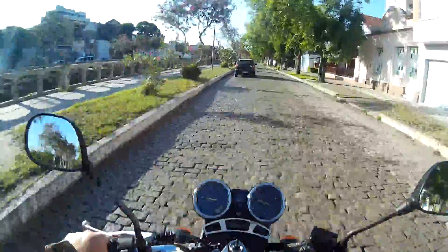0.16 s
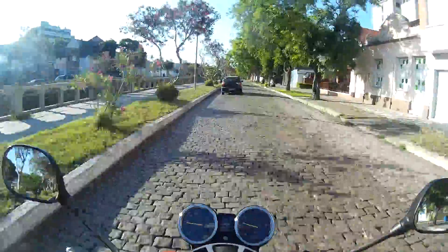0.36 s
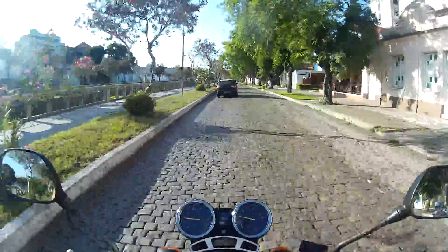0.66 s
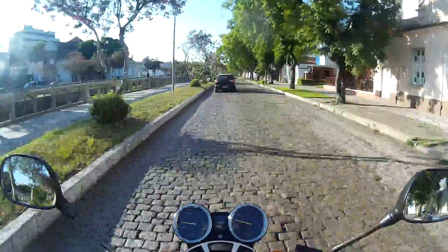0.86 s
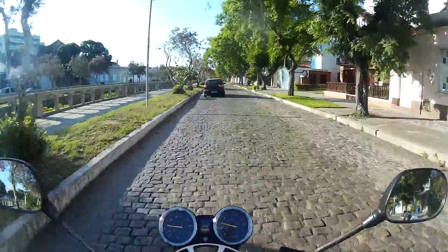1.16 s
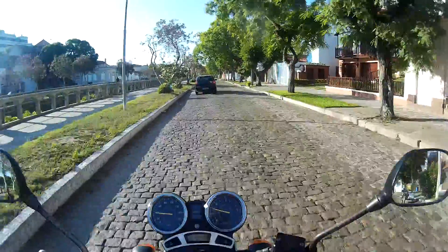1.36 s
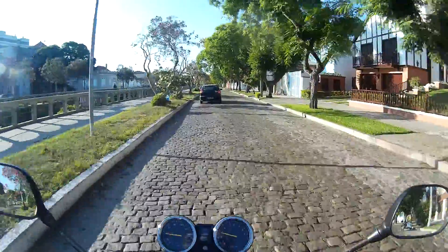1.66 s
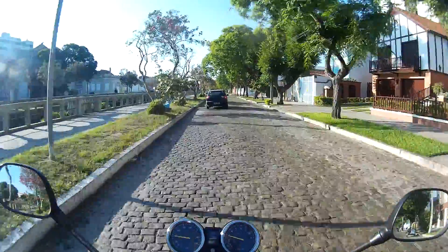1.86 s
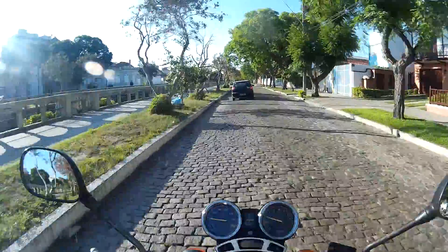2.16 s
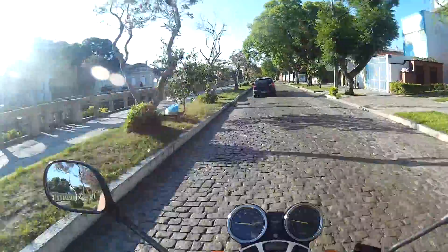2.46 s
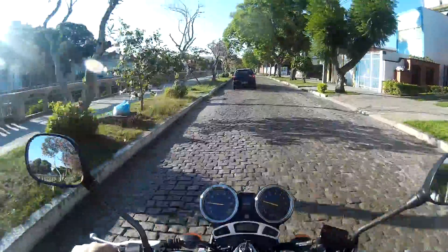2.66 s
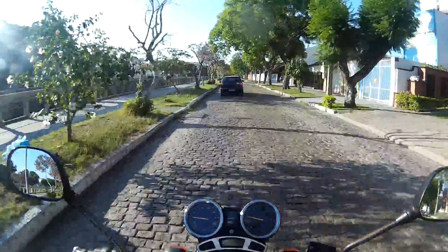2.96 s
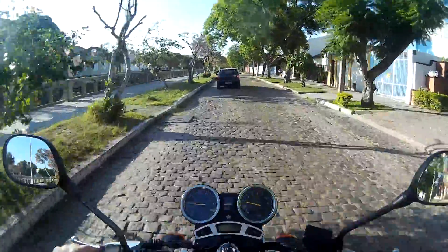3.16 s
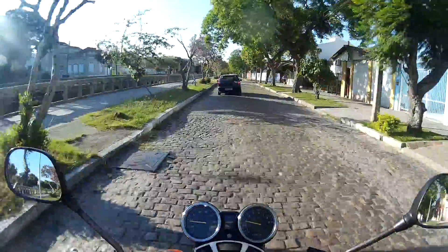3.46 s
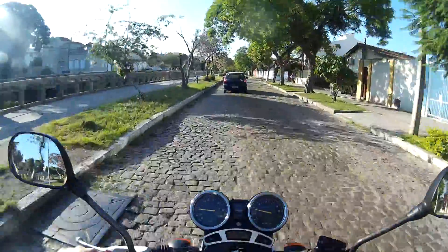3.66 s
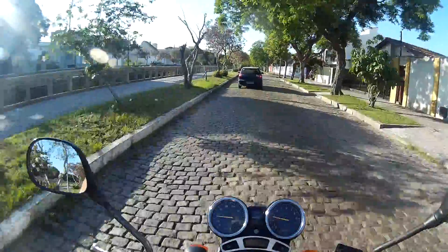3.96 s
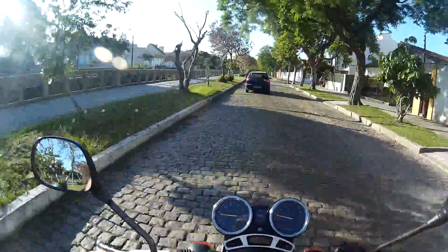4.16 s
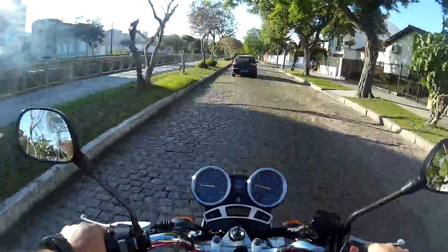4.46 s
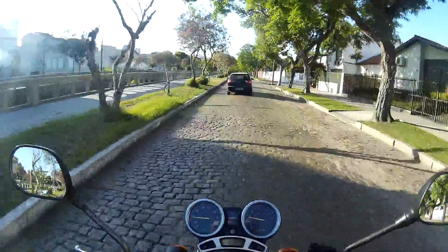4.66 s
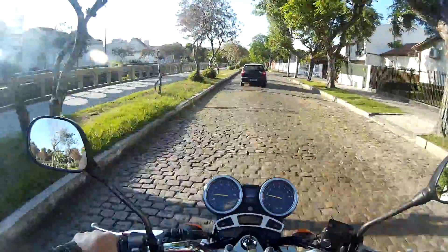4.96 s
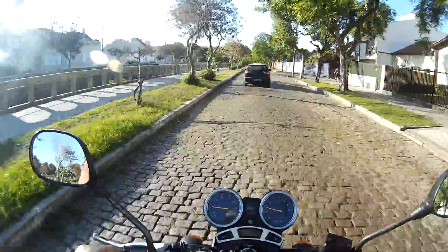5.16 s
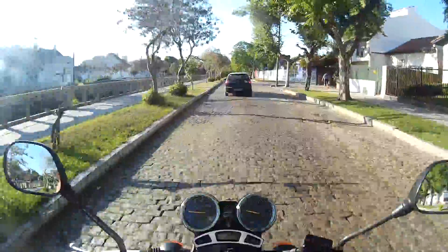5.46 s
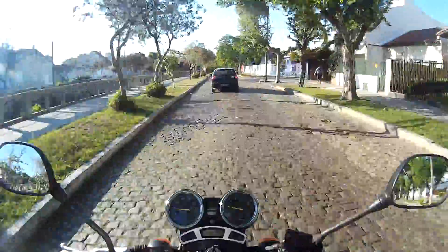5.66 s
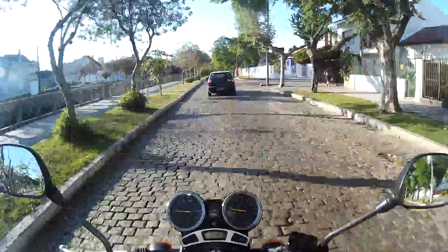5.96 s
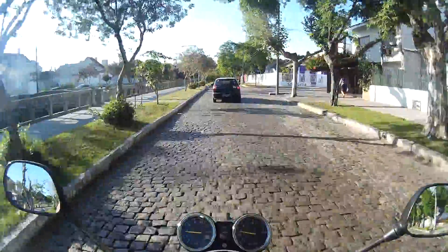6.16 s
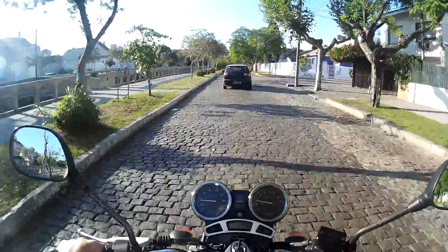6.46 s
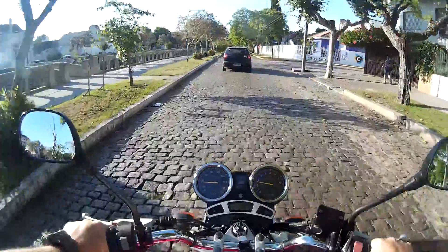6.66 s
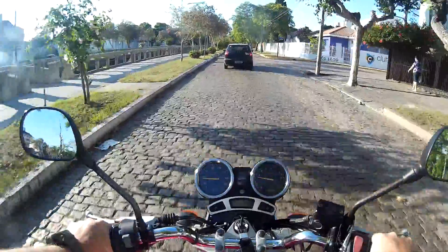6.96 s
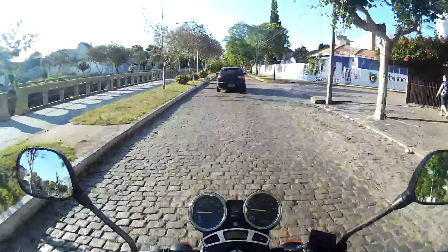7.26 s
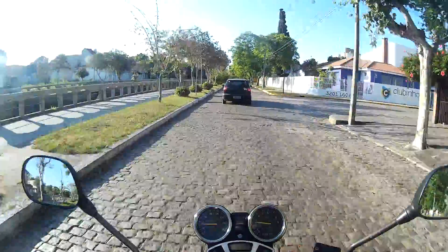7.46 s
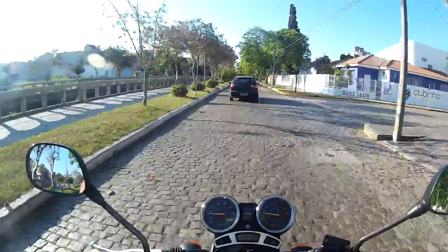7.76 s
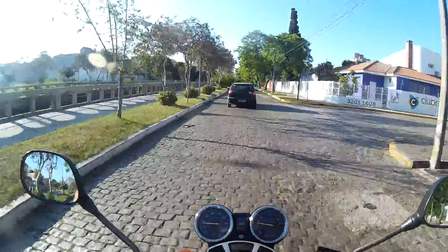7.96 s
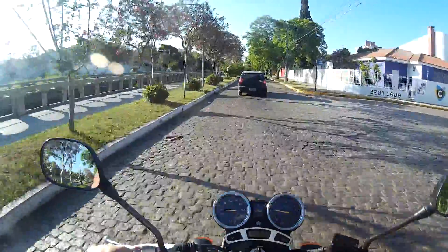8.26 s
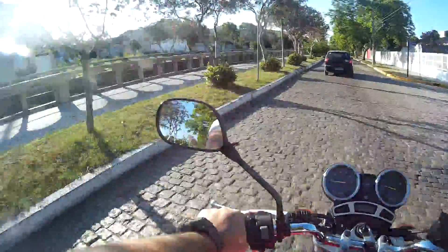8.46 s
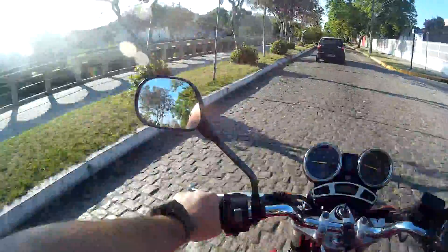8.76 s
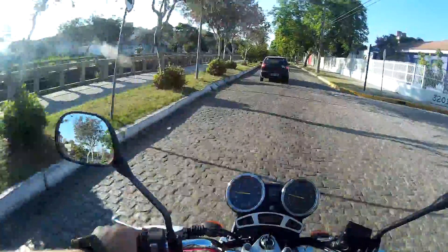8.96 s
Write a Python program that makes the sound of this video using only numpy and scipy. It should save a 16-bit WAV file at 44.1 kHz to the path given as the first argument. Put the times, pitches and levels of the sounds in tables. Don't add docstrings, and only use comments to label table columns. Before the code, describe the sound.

Heard from inside a plastic case on the rider: dull single-cylinder drone, deep jolting rumble, thin ringing whine and uneven knocks on cobbles.

```python
import sys
import numpy as np
from scipy import signal
from scipy.fft import rfft, irfft, next_fast_len
from scipy.io import wavfile
from scipy.ndimage import map_coordinates

SR = 44100
rng = np.random.default_rng(int(sys.argv[2]) if len(sys.argv) > 2 else 0)


def generate_wav(sig):
    pcm = np.round(np.clip(np.atleast_2d(sig).T, -1, 1) * 32767).astype(np.int16)
    wavfile.write(sys.argv[1], SR, pcm)


def invert_db(x):
    u = np.asarray(x, float) / 20
    return 10 ** u


N = 402176

# [t/s, roughness/dB]
ROUGHNESS = [(0, 2.5), (.3, -1.5), (.72, 1), (1.05, 0), (1.6, 2.5), (2.2, 3), (2.7, 3), (3.2, -1), (3.6, 2),
             (3.95, -2.5), (4.18, 3.5), (4.6, -1), (5.4, 1.5), (6.2, -4), (7.2, -.5), (7.7, 1), (8.0, -0.5),
             (9.12, 0.5)]
# [t/s, firing rate f/Hz, level passed into the frame/dB]
ENGINE_SPEED = [(0, 31.77, -51.5), (1, 32.19, -63), (1.8, 32.3, -61), (2.6, 31.43, -50), (4, 30.84, -52),
                (5, 30.6, -57.5), (5.7, 30.33, -59), (6.1, 29.22, -51), (6.6, 29.1, -52.5),
                (7.2, 29.25, -63), (8, 29.57, -64), (9.12, 29.86, -55)]
# [f/Hz, level per Hz/dB]
HISS_COLOUR = [(1000, 1), (6000, 1), (14500, 0), (15500, -2)]


def unit(x):
    return x / np.sqrt(np.mean(x ** 2) + 1e-20)


def curves(rows):
    s, *columns = np.transpose(rows)
    return [np.interp(np.arange(N) / SR, s, column) for column in columns]


def wobble(rate):
    knots = rng.standard_normal(int(N * rate / SR) + 4)
    return map_coordinates(knots, [np.arange(N) * rate / SR])


def filtered(x, response):
    m = next_fast_len(N + SR // 2)
    return irfft(rfft(x, m) * response(np.fft.rfftfreq(m, 1 / SR)), m)[:N]


def coloured(points):
    f, db = np.transpose(points)

    def gain(hz):
        return invert_db(np.interp(np.log(hz + 1), np.log(f + 1), db, -120, -120))

    return unit(filtered(rng.standard_normal(N), gain))


def resonant(x, modes, dull_hz):
    def response(f):
        total = 0
        for k, (centre, width, db) in enumerate(modes):
            damping = 1j * f * width
            total = total + (-1) ** k * invert_db(db) * damping / (centre ** 2 - f ** 2 + damping)
        return total / (1 + 1j * f / dull_hz) ** 2

    return filtered(x, response)


def chatter(rate, spread_db, share):
    happens = rng.random(N) < rate / SR
    size = invert_db(spread_db * np.clip(rng.standard_normal(N), -2, 2))
    taps = happens * size * rng.choice([-1, 1], N)
    return rng.standard_normal(N) + share * unit(taps)


def road():
    # [t/s, peak level/dB, width/s]
    high_stones = [(0.359, -31, 0.009), (0.49, -32, 0.0078), (0.568, -31, 0.012), (0.677, -24.5, 0.012),
                   (0.743, -32, 0.0092), (1.141, -30, 0.01), (1.722, -32, 0.0096), (1.788, -31.5, 0.013),
                   (1.982, -27.9, 0.015), (2.052, -29, 0.025), (2.124, -31.5, 0.027), (2.498, -33.5, 0.016),
                   (2.605, -33, 0.013), (2.82, -33, 0.031), (2.895, -34, 0.025), (3.069, -32.5, 0.028),
                   (3.119, -29, 0.011), (3.606, -32.5, 0.012), (3.673, -31, 0.011), (4.121, -33.5, 0.027),
                   (4.188, -25.5, 0.01), (5.468, -32.5, 0.014), (5.703, -32.5, 0.013), (5.956, -30.5, 0.01),
                   (7.175, -30, 0.013), (7.418, -35, 0.01), (7.653, -31, 0.021), (7.711, -29.5, 0.011),
                   (7.782, -31, 0.018), (8.195, -30, 0.0079)]
    # [t/s, peak level/dB]
    low_stones = [(.425, -35), (.855, -36), (0.965, -39), (1.364, -38), (1.448, -42), (1.84, -40),
                  (1.876, -36), (2.188, -38), (2.318, -35), (2.685, -38), (3.203, -35), (3.542, -33),
                  (4.247, -37), (4.319, -34), (4.786, -35.5), (5.038, -38), (5.224, -37), (5.86, -35),
                  (6.572, -34), (6.865, -36), (6.938, -32.5), (7.04, -36), (7.113, -33), (7.318, -39),
                  (7.58, -34), (8.254, -34), (8.287, -35), (8.62, -34), (8.743, -33), (8.805, -36)]
    # [f/Hz, level per Hz/dB]
    sway_colour = [(3, -19), (8, -5), (14, 0.5), (24, -5.5), (30, -4), (48, -17), (70, -67)]
    # [f/Hz, level per Hz/dB]
    frame_colour = [(35, -12), (48, -4), (56, 1.5), (68, -11.5), (90, -5.5), (118, -13), (140, -17.5),
                    (180, -23.5)]
    low_width_s, frame_ring_s, frame_kick_db = 0.014, 0.022, 20.5
    t = np.arange(N) / SR
    rough_db, = curves(ROUGHNESS)
    squeeze, boom = np.zeros(N), np.ones(N)
    for s, db, width in [*high_stones, *[(s, db, low_width_s) for s, db in low_stones]]:
        near = slice(max(round((s - .1) * SR), 0), round((s + .1) * SR))
        u = (t[near] - s) / width
        steepness = np.where(u > 0, 1.3, .8)
        squeeze[near] += invert_db(db) * np.exp(-3 * (u * steepness) ** 2)
        boom[near] += invert_db(db + frame_kick_db) * np.exp(-((t[near] - s) / frame_ring_s) ** 2 * 2)

    def undershoot(f):
        return (1j * f / 7) ** 2 / (1 + 1j * f / 9 + (1j * f / 7) ** 2)

    sway = invert_db(-46 + 1.03 * rough_db + 1.5 * wobble(4.4)) * coloured(sway_colour)
    frame = invert_db(-49 + 0.86 * rough_db + 1.45 * wobble(9.9)) * boom * coloured(frame_colour)
    return filtered(squeeze, undershoot) + sway + frame


def engine():
    # [multiple, level/dB]
    orders = [(2, -13), (3, -0.5), (4, -9.5)]
    # [f/Hz, level per Hz/dB]
    exhaust_colour = [(120, -29), (150, -15), (195, -4.5), (225, -4.5), (243, 1.5), (262, -5.5),
                      (320, -5.5), (350, -10.5), (430, -9.5), (470, -13.5), (640, -15), (800, -22),
                      (950, -21), (1250, -43)]
    # [t/s, exhaust level/dB]
    throttle = [(0, -55), (.73, -51.5), (1.15, -54), (1.7, -52.5), (1.9, -50), (2.95, -50), (3.15, -54),
                (3.6, -49), (4.0, -53.5), (4.2, -51), (4.8, -55), (5.4, -53), (6.3, -54.5), (7.3, -53),
                (8.0, -53), (8.3, -51.5), (8.65, -52), (9.12, -51)]
    hz, frame_db = curves(ENGINE_SPEED)
    phase = 2 * np.pi * np.cumsum(hz * (1 + 0.014 * wobble(5.5))) / SR
    tones = sum(invert_db(db + 1.7 * wobble(2.9)) * np.sin(k * phase) for k, db in orders)
    roar = unit(coloured(exhaust_colour) * (1 + .12 * np.cos(phase)) * invert_db(0.73 * wobble(18)))
    pipe = invert_db(-13 + 2.5 * wobble(6.7)) * np.sin(8 * phase)
    exhaust_db = curves(throttle)[0] + 1.0 + 0.84 * wobble(7.5)
    return invert_db(frame_db) * tones + invert_db(exhaust_db) * (roar + pipe)


def air_cavity(rough_db, bump, burst):
    # [f/Hz, width/Hz, level/dB]
    air_modes = [(929, 176, -18.5), (1268, 230, -10.5), (1400, 64.3, 1)]
    ringing = resonant(chatter(250, spread_db=5.0, share=0.37), air_modes, dull_hz=1420)
    return invert_db(-51.5 + 0.14 * rough_db + 0.81 * bump) * unit(invert_db(burst) * ringing)


def shell_walls(rough_db, bump, burst):
    # [f/Hz, width/Hz, level/dB]
    wall_modes = [(1748, 72, -0.5), (2000, 150, 0), (2186, 325, -5.5)]
    taps = chatter(200, spread_db=2.0, share=0.68 * invert_db(0.48 * bump))
    ringing = resonant(taps, wall_modes, dull_hz=1800)
    return invert_db(-64 + 0.37 * rough_db + 0.42 * bump) * unit(invert_db(1.2 * burst) * ringing)


def latch_and_foam(rough_db, bump, burst):
    # [f/Hz, width/Hz, level/dB]
    latch_modes = [(2546, 155, -1), (2857, 87, 4.5), (3153, 180, 0.5), (3840, 220, -2), (4090, 160, 3),
                   (4580, 460, -5)]
    taps = chatter(250, spread_db=6.0, share=0.5 * invert_db(0.55 * bump))
    parts = unit(invert_db(0.69 * burst) * resonant(taps, latch_modes, dull_hz=3980))
    scrape = unit(invert_db(1.7 * burst + 1.2 * wobble(16)) * coloured(HISS_COLOUR))
    parts = parts + invert_db(-6 - 0.15 * bump) * scrape
    return invert_db(-72 + 0.41 * rough_db + 0.58 * bump) * parts


def mount_strap(bump):
    tuned_hz, loss_db_per_hz = 28.8, 1.1
    hum = resonant(rng.standard_normal(N), [(1077, 37, 0)], dull_hz=1160)
    hum = unit(invert_db(0.76 * wobble(7.8)) * hum)
    strap_db = -63 - loss_db_per_hz * abs(curves(ENGINE_SPEED)[0] - tuned_hz)
    return invert_db(strap_db + 0.83 * bump) * hum


def case():
    # [t/s, length/s, extra shaking level/dB]
    rough_stones = [(0.384, 0.019, 3.5), (0.486, 0.087, 8), (0.582, 0.012, 10), (0.668, 0.037, 8),
                    (0.707, 0.013, 15), (0.751, 0.036, 12.5), (0.866, 0.03, 5.5), (1.165, 0.049, 3.5),
                    (1.788, .03, 4), (2.064, .03, 7.5), (2.127, 0.079, 6), (2.257, 0.016, 4),
                    (2.508, 0.029, 6), (2.567, 0.038, 13), (2.614, 0.028, 6.5), (2.9, 0.0092, 9.5),
                    (3.217, 0.021, 7), (3.342, 0.016, -3), (4.087, 0.04, 5), (4.25, 0.12, 6),
                    (5.5, 0.035, 4), (5.96, 0.061, 3), (6.583, 0.034, 4.5), (6.757, 0.03, 10.5),
                    (6.899, 0.035, 6), (7.192, 0.037, 8), (7.705, 0.13, 3.5), (8.507, 0.022, 5.5),
                    (8.70, 0.1, 1.5), (9.049, 0.017, 4.5)]
    t = np.arange(N) / SR
    rough_db, = curves(ROUGHNESS)
    bump = sum(db * np.exp(-((t - s) / length) ** 2 * 2) for s, length, db in rough_stones)
    burst = wobble(22)
    rattle = shell_walls(rough_db, bump, burst) + latch_and_foam(rough_db, bump, burst)
    return air_cavity(rough_db, bump, burst) + rattle + mount_strap(bump)


def pressed(modes, touch):
    t = np.arange(round(touch * SR)) / SR
    swell = np.sin(np.pi * (t / touch) ** 0.8) ** 2
    return swell * sum(invert_db(db) * np.sin(2 * np.pi * hz * t) for hz, db in modes)


def knocks():
    # [t/s, peak level/dB, cavity level/dB, click level/dB, wall f/Hz]
    blow_list = [(0.6813, -18, -4.5, -19, 2000), (2.106, -44.5, 6, -27, 1800),
                 (2.1275, -33.5, 4, -26, 1900), (2.194, -41, 9.5, -27, 2070),
                 (2.5015, -29.5, -7.5, -22.5, 2000), (2.591, -46.5, 15.5, -19, 1750),
                 (2.619, -20.5, -1.5, -20.5, 2005), (4.127, -45.5, 4, -30, 2080),
                 (4.182, -29.5, -16, -29, 1840), (4.2054, -25, -1, -18.5, 2000),
                 (4.2448, -47, 11.5, -22, 2030), (4.2633, -35, 0.5, -29, 1970),
                 (4.328, -28.5, -6.5, -21.5, 1970), (4.363, -53, -7, -22, 2030),
                 (4.8497, -38, 2.5, -28, 1970), (5.5337, -44, 2, -26, 1790), (0.366, -48, 9.5, -25, 1900),
                 (6.733, -51.5, 12, -20, 1870), (5.965, -52, 12, -22, 1900), (6.528, -40, -9, -30, 1870),
                 (6.8771, -48.5, 11, -23, 1710), (6.9192, -54, 12, -8, 2100), (4.074, -48.5, 12, -25, 1900),
                 (8.599, -53, -4, -14, 1970)]
    wall, click, blows = np.zeros(N), np.zeros(N), np.zeros(N)
    variations = rng.normal(0, 1.5, (len(blow_list), 4))
    for (s, db, cavity_db, click_db, hz), vary in zip(blow_list, variations):
        at = round(s * SR)
        thud = invert_db(db) * pressed([(.97 * hz, 0)], touch=.0046)
        click_modes = [(3000, vary[0] - 5), (3600, vary[1]), (4150, vary[2] - 7),
                       (4600, vary[2] - 7), (5200, vary[3] - 20)]
        tick = invert_db(db + click_db) * pressed(click_modes, touch=.0034)
        wall[at:at + len(thud)] += thud
        click[at:at + len(tick)] += tick
        blows[at] = invert_db(db + cavity_db)
    wall = wall + resonant(wall, [(1990, 71, -9.5), (2450, 330, 14.0)], dull_hz=8900)
    wall = wall - resonant(wall, [(2310, 320, -2.5), (2650, 180, -18)], dull_hz=30000)
    push = signal.fftconvolve(blows, pressed([(1300, 0)], touch=0.0012))[:N]
    air = resonant(push, [(303, 230, -4.0), (944, 110, -16), (1392, 43.6, 10.5)], dull_hz=2950)
    click = click + resonant(click, [(3690, 98, -4), (3980, 190, 5.5)], dull_hz=8900)
    return invert_db(0.5) * wall + invert_db(14) * air + invert_db(2.5) * click


def scene():
    return (road() + engine() + case() + knocks())[None]


def low_pass(x):
    return signal.sosfilt(signal.butter(12, 15830, fs=SR, output="sos"), x)


def record(dry):
    hiss = invert_db(-71 + 0.48 * wobble(11)) * coloured(HISS_COLOUR)
    return low_pass(dry + hiss)


dry = scene()
out = record(dry)
generate_wav(out)
```